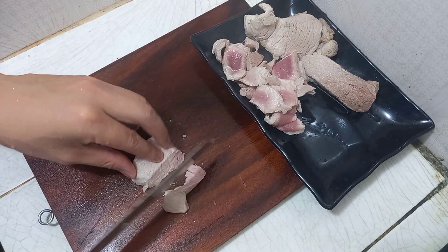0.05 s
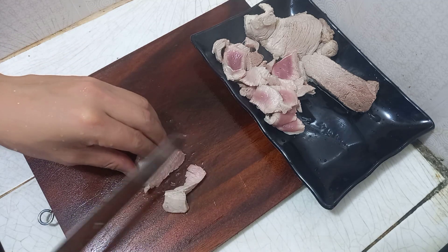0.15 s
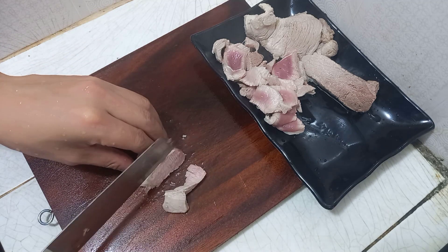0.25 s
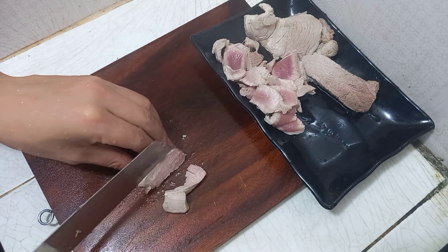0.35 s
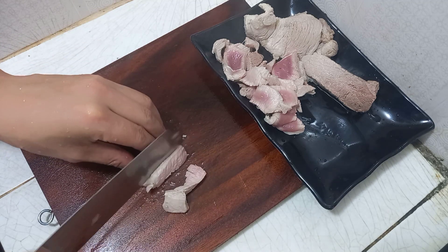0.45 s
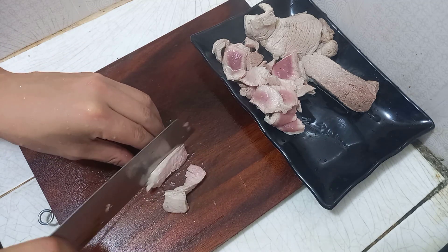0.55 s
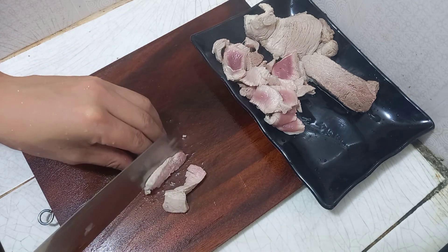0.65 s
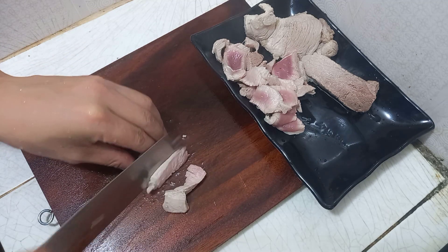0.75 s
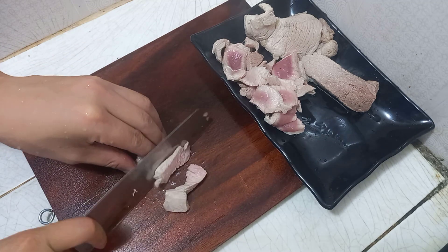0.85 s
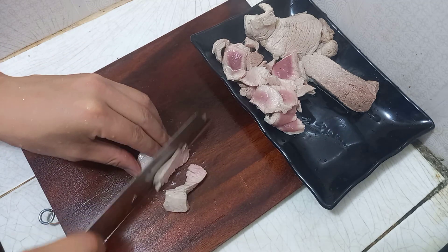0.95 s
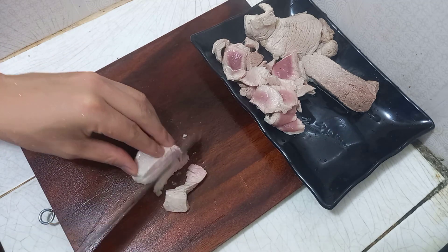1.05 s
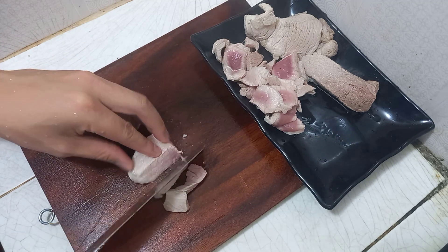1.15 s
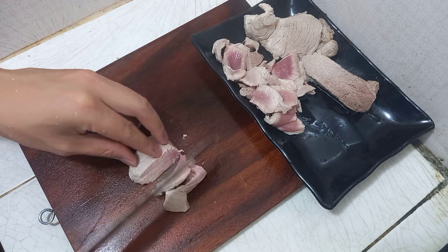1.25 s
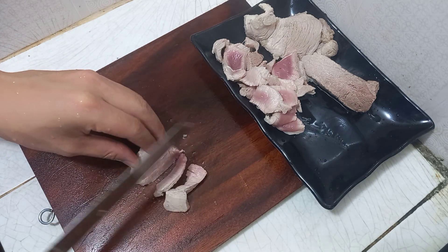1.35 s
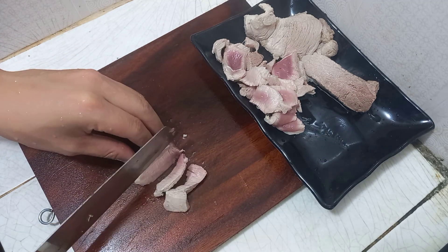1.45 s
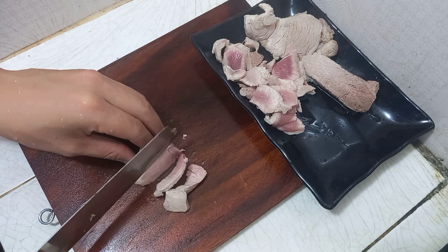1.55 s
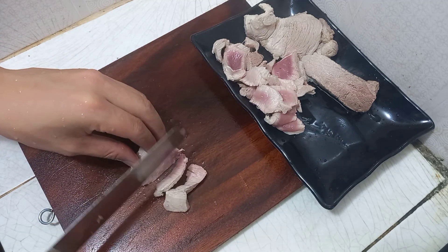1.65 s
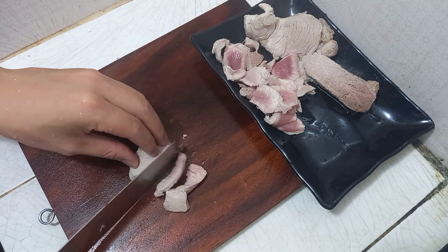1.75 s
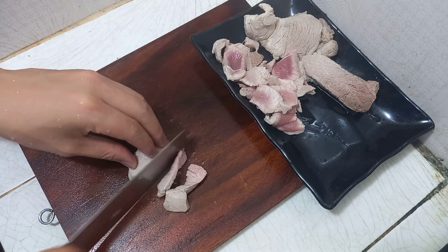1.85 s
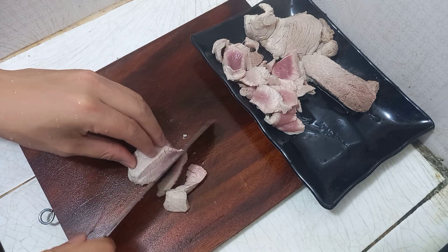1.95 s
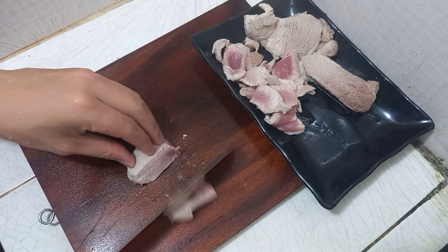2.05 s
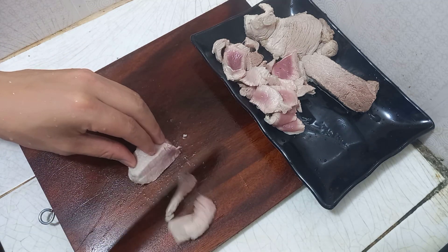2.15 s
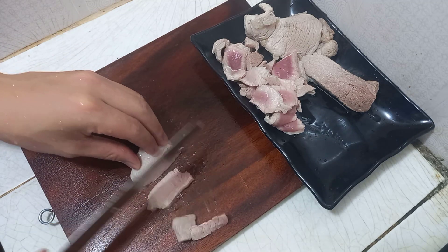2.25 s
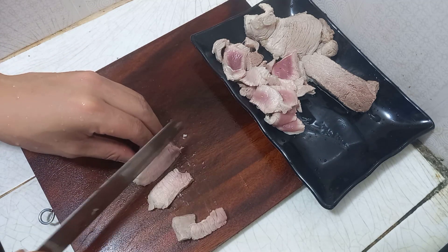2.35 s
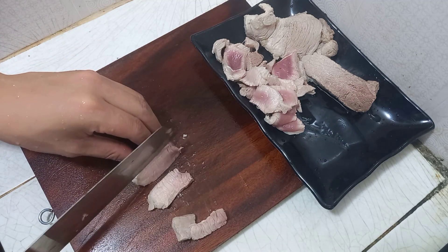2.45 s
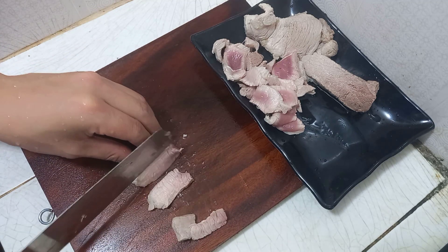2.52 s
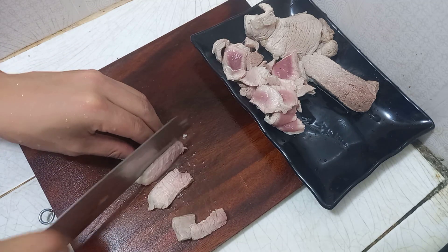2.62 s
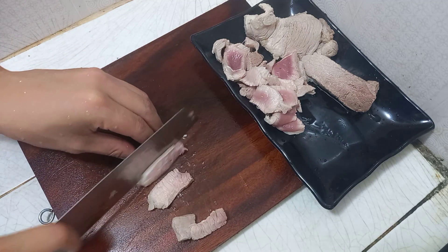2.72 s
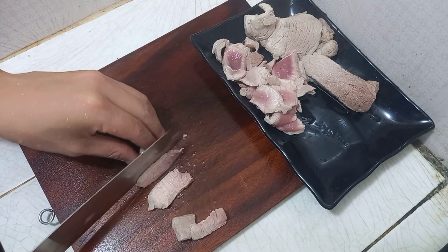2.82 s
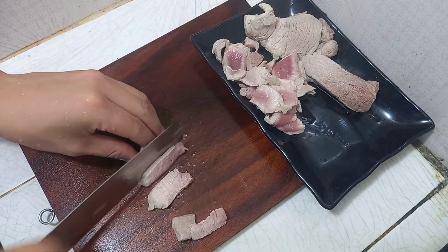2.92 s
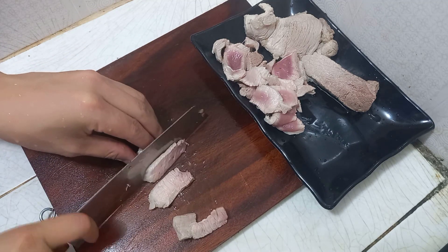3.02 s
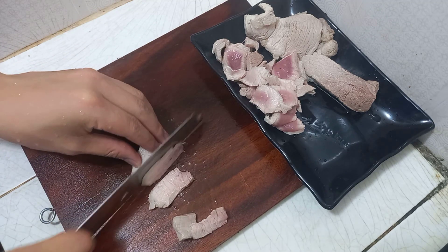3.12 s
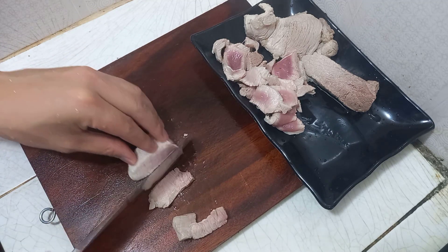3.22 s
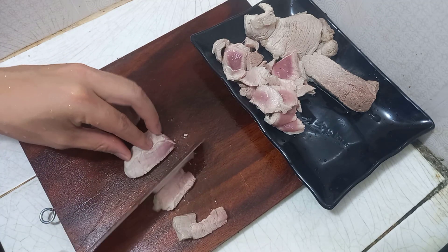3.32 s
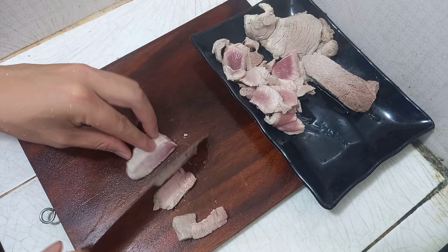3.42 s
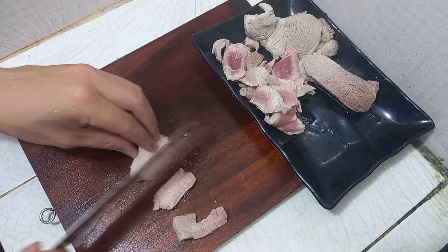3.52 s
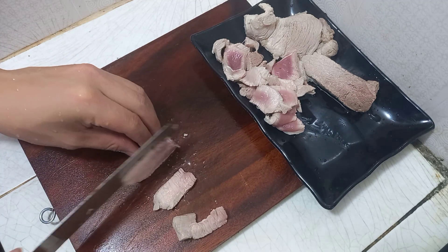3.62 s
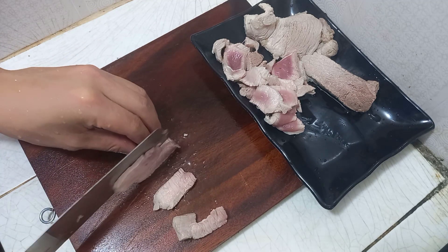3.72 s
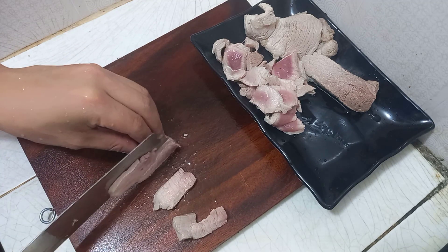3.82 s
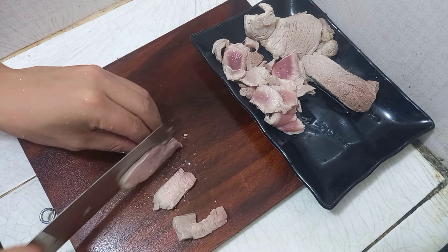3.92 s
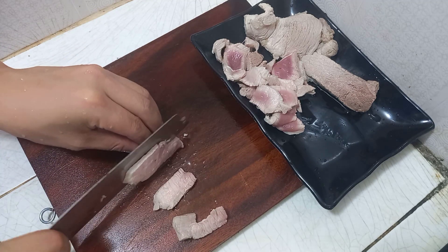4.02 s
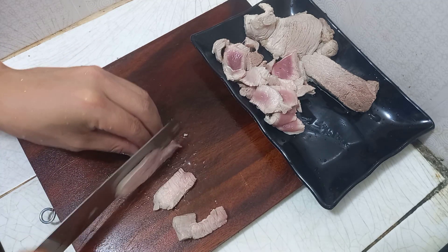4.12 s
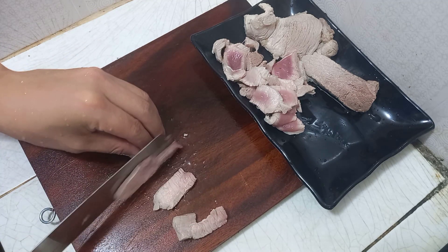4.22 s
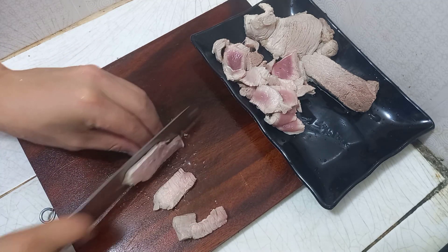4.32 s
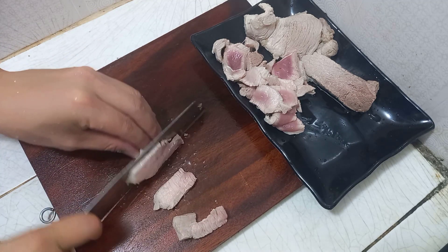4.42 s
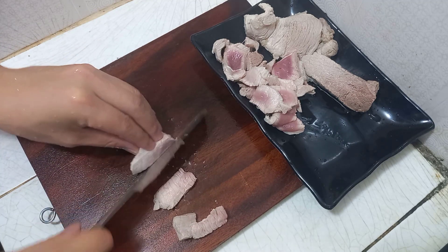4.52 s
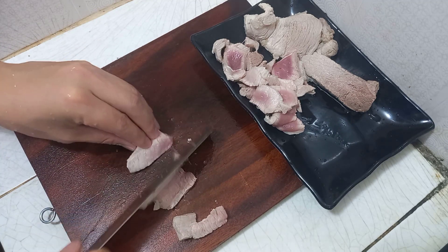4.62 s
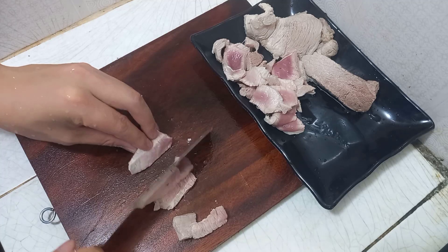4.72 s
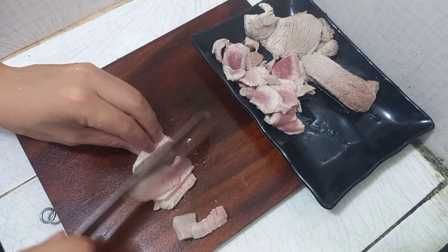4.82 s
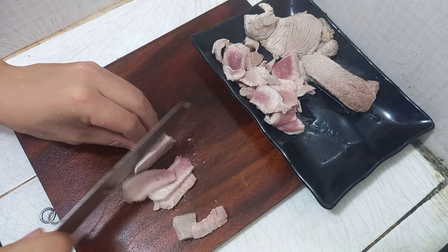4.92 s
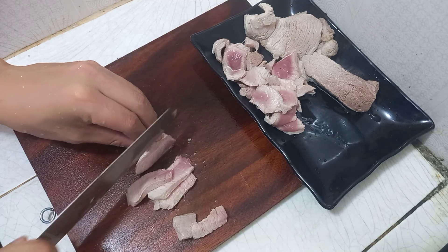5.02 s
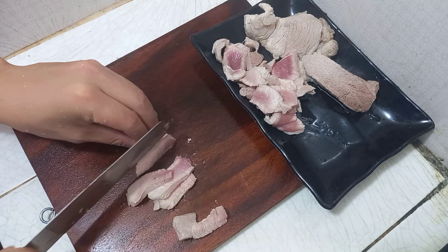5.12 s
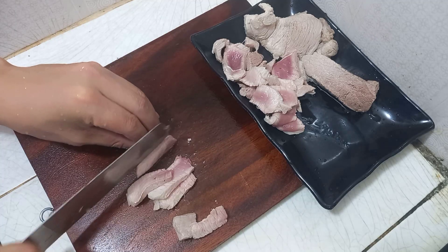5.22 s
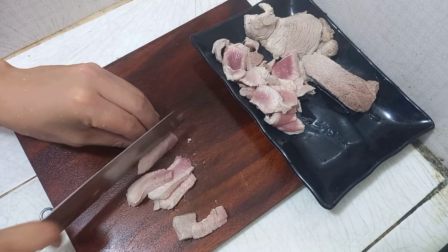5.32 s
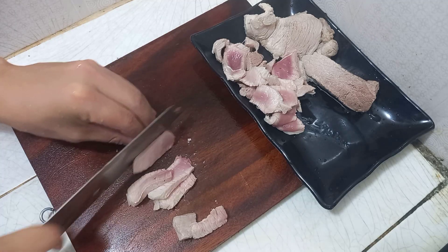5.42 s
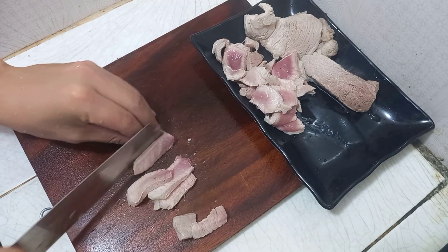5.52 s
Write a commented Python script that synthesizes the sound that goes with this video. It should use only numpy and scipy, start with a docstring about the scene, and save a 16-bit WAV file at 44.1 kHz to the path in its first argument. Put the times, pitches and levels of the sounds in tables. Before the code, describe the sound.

A low hum and soft air hiss run throughout in a small hard room. Close spaced stereo microphones catch a knife cutting cooked meat on a wooden board, its treble leaning left. After near quiet, gritty sawing strokes begin around 0.5 seconds and grow into a loud, hollow knock at 0.87, its low woody ring wavering briefly. A softer slice and a tiny tick follow at about 1.0; another knock, sharper and crisper, lands at 1.8. At 2.04 the blade is lightly tapped and rings, then drags sideways in a bright, singing scrape until about 2.15, with small ticks to 2.5. Slicing resumes at 2.65, swelling into the strongest knock at 3.03, then a quick, rough scrape at 3.3 and faint ticks. Strokes from 3.9 build to a last solid knock at 4.39, a short brush follows at 4.6, and lighter, faint sawing strokes close from 5.0 to 5.5.

```python
"""A low hum and a soft hiss of air fill a small hard room from start to end: patchy noise shaped by tone curves.
A kitchen knife saws through cooked meat: clumpy grains of noise swell with each stroke and shake the board.
From just under a second it knocks on the wooden board, whose modes ring over a beating pair in the counter.
Small ticks, short bursts of banded noise, follow from one second on. At two seconds the blade rings from a tap
and sings as it scrapes the slices aside; lighter strokes close. Two spaced microphones hear the knife from the left."""
import sys
import numpy as np
from scipy import signal
from scipy.fft import rfft, irfft, next_fast_len
from scipy.io import wavfile
from scipy.ndimage import uniform_filter1d

SR = 44100
rng = np.random.default_rng(int(sys.argv[2]) if len(sys.argv) > 2 else 0)


def wav_out(sig):
    """Save sig, one row per channel (or a flat mono array), as 16-bit PCM at SR to the path in sys.argv[1]."""
    wavfile.write(sys.argv[1], SR, np.round(np.clip(np.atleast_2d(sig).T, -1, 1) * 32767).astype(np.int16))


N = 245195


def amp(db):
    """Turns decibels into a gain."""
    return 10 ** (np.asarray(db) / 20)


def evened(x):
    """Scales a signal to an RMS of one."""
    return x / np.sqrt(np.mean(x ** 2) + 1e-20)


def read(points, hz):
    """Reads a curve of (frequency, value) points, interpolating along log frequency."""
    f, value = np.transpose(points)
    return np.interp(np.log(hz + 1), np.log(f + 1), value)


def add(mix, s, sound):
    """Mixes a sound into the track in place, s seconds in, cutting what runs past the end."""
    part = mix[..., round(s * SR):][..., :sound.shape[-1]]
    part += sound[..., :part.shape[-1]]


def colour(x, gain):
    """Filters by a gain given as a function of Hz."""
    size = next_fast_len(x.shape[-1])
    spectrum = rfft(x, size) * gain(np.fft.rfftfreq(size, 1 / SR))
    return irfft(spectrum, size)[..., :x.shape[-1]]


# hum tone curve: (frequency [Hz], relative level [dB])
HUM_TONE = [(20, -38), (33, -25), (48, -16), (65, -1.5), (78, -12), (98, 2), (120, -11.5), (145, -4),
            (165, -6.5), (195, -14.5), (225, -10), (280, -21), (400, -29.5), (650, -58)]
# room air and microphone hiss tone curve: (frequency [Hz], relative level [dB])
AIR_TONE = [(150, -65), (300, -4), (500, -7.5), (1000, -14), (2000, -20), (4000, -26.5), (7500, -33),
            (10500, -33), (13000, -22.5), (14500, -28.5), (15600, -29.5), (15900, -68)]
# background likeness of the two microphones: (frequency [Hz], left-right correlation [-1 to 1])
LIKENESS = [(60, 1), (180, 0.63), (550, 0.007), (1650, 0.021), (4970, 0.077), (15000, -0.086)]


def background(tone, db, patchy_db, size):
    """Steady noise from random short-time spectra, with random patches in level over time and frequency."""
    frames = 4 * N // size + 5
    hz = np.fft.rfftfreq(size, 1 / SR)
    a, b, c, d, patches = rng.standard_normal((frames, len(hz), 5)).T
    patches = evened(uniform_filter1d(uniform_filter1d(patches, 9, 0), 5, 1))
    same = np.clip(read(LIKENESS, hz), -1, 1)[:, None]
    left = a + 1j * b
    right = same * left + np.sqrt(1 - same ** 2) * (c + 1j * d)
    z = np.array([left, right]) * amp(read(tone, hz)[:, None] + patchy_db * patches)
    noise = signal.istft(z, nperseg=size, noverlap=3 * size // 4)[1][:, :N]
    return amp(db) * evened(noise) * amp([[.4], [-.4]])  # slightly louder on the left


# knife noise balance: (frequency [Hz], left minus right [dB])
KNIFE_LEAN = [(60, 2.0), (180, -40), (550, -9.5), (1650, 3.5), (4970, 0), (15000, 13)]
KNIFE_LAG_S = 0.000391  # the right microphone hears knife noise this much later
SHARED = 0.13  # least share of the knife noise that both microphones hear alike
ALIKE_HZ = 666  # well below this both microphones hear the knife noise alike


def pair(x):
    """Places knife noise on two microphones; in the treble the right one mostly hears nearby surfaces."""
    def share(hz):
        return np.clip(SHARED + (1 - SHARED) / (1 + (hz / ALIKE_HZ) ** 2), 0, 1)

    right = colour(x[0], share) + colour(x[1], lambda hz: np.sqrt(1 - share(hz) ** 2))
    ear = np.array([[0], [1]])  # left, right

    def place(hz):
        balance = amp(read(KNIFE_LEAN, hz) * (.5 - ear))
        return balance * np.exp(-2j * np.pi * hz * KNIFE_LAG_S * ear)

    return colour(np.array([x[0], right]), place)


def mode(hz, db, t60, lag=0.):
    """One dying sine, starting after lag seconds."""
    t = np.maximum(np.arange(SR) / SR - lag, 0)
    return amp(db - 60 * t / max(t60, .005)) * np.sin(2 * np.pi * hz * t)


# counter under the board, a close pair in opposite phase that beats:
# (frequency [Hz], relative level [dB], t60 [s])
COUNTER_MODES = [(158.2, 0, 0.74), (173.6, 1.5, 0.63)]
# board modes: (frequency [Hz], relative level [dB], t60 [s], left minus right [dB])
BOARD_MODES = [(229, -9.5, 0.36, 7), (260, 1, 0.042, .5), (325.7, -7.5, 0.33, -9), (382, -3, 0.24, -8),
               (429, 2, 0.097, 3.5), (463, -11, 0.49, -11), (484, 2.5, 0.094, 7.5), (557, -1, 0.067, -16.5),
               (598.8, -4, 0.26, 7), (614, 0, 0.16, -7), (672.6, -9.5, 0.19, -19.5),
               (726.4, -8.5, 0.16, 11), (795, -11, 0.049, -15), (836, -10, 0.21, -1), (923, -3.5, 0.15, 9),
               (975, -12, 0.15, 25.5), (1063, -24, 0.12, -19), (1150, -8.5, 0.032, 14.5),
               (1246, -11.5, 0.044, -7), (1450, -15, 0.049, 9), (1550, -1, 0.14, 4),
               (1668, -4.5, 0.063, 21), (1980, -13.5, 0.052, 32)]
WOOD_LAG_S = 0.0001  # the right microphone hears the wood this much later


def wood(thump_db, upper_db, place):
    """Impulse response of board and counter at both microphones; the place struck weights the board modes."""
    (low_hz, low_db, low_t60), (up_hz, up_db, up_t60) = COUNTER_MODES
    out = np.zeros((2, SR))
    for ear, lag in enumerate((0., WOOD_LAG_S)):
        lower = mode(low_hz, low_db, low_t60, lag)
        upper = mode(up_hz, up_db + upper_db, up_t60, lag)
        out[ear] = amp(thump_db) * (lower - upper)
        for k, (hz, db, t60, lean_db) in enumerate(BOARD_MODES):
            weight = 1 + .5 * np.cos(np.pi * (k + 1) * place)
            sign = (-1) ** (k // 2)
            out[ear] += sign * weight * mode(hz, db + lean_db * (.5 - ear), t60, lag)
    # a small board radiates no deep bass
    return signal.sosfilt(signal.butter(2, 110, "high", fs=SR, output="sos"), out)


def grit():
    """Dense uneven grains that come in clumps."""
    clumps = evened(uniform_filter1d(rng.standard_normal(N), 90))
    grain_db = 1.1 * clumps + 1.35 * rng.exponential(1, N)
    return evened(rng.standard_normal((2, N)) * amp(grain_db))


REST_DB = -30  # level at the start of a run-up and the end of a run-out, re the hold


def sweep(s, up, hold, out, db, swell_db):
    """One movement: gain, dB relative to the hold and seconds spent in the hold, over time."""
    t = np.arange(N) / SR - s
    held = np.clip(t, 0, hold)
    before = np.maximum(-t, 0) / max(up, .002)
    after = np.maximum(t - hold, 0) / max(out, .002)
    under_db = REST_DB * (before + after)
    return amp(db + swell_db * held / max(hold, .001) + under_db), under_db, held


# knife strokes: (full speed reached [s], run-up [s], hold [s], run-out [s], edge hiss [dB],
# swell over the hold [dB], push into the board [dB re hiss], weight on the counter [dB re hiss],
# rasp near 2.8 kHz [dB], treble tilt [dB per octave])
KNIFE_STROKES = [ (0.0, .01, .01, 0.11, -54.5, -1, -4, -8, 0, -3),
                 (.492, 0.051, 0.058, 0.12, -40, 1, -6.5, 4, 3.5, 1.5),
                 (0.677, 0.11, 0.055, 0.064, -45.5, 0.5, -1, 6, 2, 1.5),
                 (0.823, 0.077, 0.048, 0.082, -36, 5, 1.5, 4, 4, 1.5),
                 (1.028, 0.13, 0.098, 0.083, -44, -4.5, 0.5, 1, 0, -0.5),
                 (1.903, 0.11, 0.072, 0.1, -41.5, 0, 6.5, -4, -7, -2),
                 (2.04, 0.0086, .004, 0.045, -27.5, -1, -2, -21, 2.5, 0),
                 (2.096, 0.042, 0.028, 0.034, -24.5, -2, 0.5, -9.5, 5.5, 0),
                 (2.143, .02, 0.017, 0.17, -40, -3, -10, -13, 4, -1),
                 (2.304, .006, .008, 0.061, -44.5, -0.5, -16, -16, 12, 3),
                 (2.656, 0.036, 0.05, 0.092, -42, -1, -9, 6, 1, 2),
                 (2.874, 0.15, .02, .055, -48.5, -1.5, -22, -10, 4, 0.5),
                 (2.974, 0.045, 0.066, 0.047, -43, 13.5, 1.5, 4, 5, 2),
                 (3.175, 0.23, 0.11, .03, -45.5, -5, 4.5, 1, 1.5, -1),
                 (3.299, 0.04, 0.015, 0.037, -30, 3.5, 1.5, -12, 7.5, -1),
                 (3.332, .02, 0.017, 0.15, -37.5, -2.5, -2.5, -11, -3, -2.5),
                 (3.947, .05, 0.095, 0.12, -48.5, 4.5, -6, 0.5, 3.5, 3),
                 (4.195, .2, .015, .11, -50, 1.5, -2.5, 6, 0, 0.5),
                 (4.308, 0.047, 0.074, 0.062, -42.5, 13, 4, 5, 5, 2),
                 (4.456, .05, 0.037, .05, -52, 3.5, -3, -5, -1, 2.5),
                 (4.55, 0.13, .015, 0.044, -53, 1, -6, -8, -4, -2),
                 (4.601, 0.024, 0.0066, 0.048, -37, 0, 2, -4, -1.5, -1),
                 (4.638, .02, 0.033, 0.13, -49, -1.5, -1, -7, 1, -0.5),
                 (5.02, 0.036, .005, 0.047, -58, 4, 11, 3, 14.5, 0.5),
                 (5.347, 0.079, 0.051, .07, -46, 2, -4.5, -3, 12.5, 2),
                 (5.55, 0.2, 0.018, .05, -48, 3, -2.5, 4, 2, 1), ]
DULLING = .06  # treble tilt lost, dB per octave, for each dB under the hold
DARKENING = 9.3  # treble tilt lost, dB per octave, for each second of hold as the edge sinks in


def motion():
    """Strokes add in power; where they overlap, push, weight, rasp and tilt lean to the louder one."""
    power, controls = 1e-14, 0
    for *shape, push_db, weight_db, rasp_db, tilt in KNIFE_STROKES:
        gain, under_db, held = sweep(*shape)
        steady = np.outer([push_db, weight_db, rasp_db], np.ones(N))
        tilt_now = tilt + DULLING * under_db - DARKENING * held
        controls = controls + gain ** 2 * np.vstack([steady, tilt_now])
        power = power + gain ** 2
    return uniform_filter1d(np.sqrt(power), 100), *controls / power


# edge in meat and on wood, tone curve: (frequency [Hz], relative level [dB])
EDGE_TONE = [(600, -8), (1200, 2), (1700, -0.5), (2800, -4.5), (3500, -0.5), (6600, -1), (7600, -9.5),
             (9240, -2), (11000, -6.5), (14600, -4.5), (15550, -6.5), (15850, -50)]


def strokes():
    """Tearing fibres and a dragging edge hiss in shifting patches of colour and shake the board."""
    level, push_db, weight_db, rasp_db, tilt = motion()
    grains = grit()
    edge = evened(colour(grains, lambda f: amp(read(EDGE_TONE, f))))
    hz, at, z = signal.stft(edge, SR, nperseg=256)
    t = np.arange(N) / SR
    octaves = np.log2(np.maximum(hz, 900) / 7000)[:, None]  # the tilt pivots at 7 kHz
    tilt_db = octaves * np.interp(at, t, tilt)
    rasp = np.exp(-((hz[:, None] - 2800) / 380) ** 2) * np.interp(at, t, rasp_db)
    patches = evened(uniform_filter1d(uniform_filter1d(rng.standard_normal(z.shape[1:]), 4, 0), 9, 1))
    hiss = signal.istft(z * amp(tilt_db + rasp + 3.0 * patches), SR, nperseg=256)[1][:, :N]
    board = wood(-np.inf, 0, 0.352)  # no counter in it
    counter = wood(0, -0.88, 0.353) - board
    shake = 0
    for db, part in ((push_db, board), (weight_db, counter)):
        body = colour(part, lambda f: 1 / (1 + (f / 480) ** 2))  # the meat softens the push
        push = grains[:1] * level * amp(db)
        shake = shake + signal.fftconvolve(push, body / np.linalg.norm(body[0]), axes=1)[:, :N]
    return pair(hiss * level) + shake


# room decay: (frequency [Hz], t60 [s])
ROOM_DECAY = [(200, 0.7), (700, 0.41), (2000, 0.31), (6000, 0.17), (14000, 0.14)]


def room(x):
    """Sparse echo taps of random sign, each band dying at its own speed."""
    taps = np.zeros((2, SR))
    at = np.arange(100, SR - 20, 20) + rng.integers(0, 20, (2, (SR - 101) // 20))
    np.put_along_axis(taps, at, rng.choice([-1., 1.], at.shape), 1)
    hz, t, z = signal.stft(taps, SR, nperseg=256)
    t60 = np.maximum(read(ROOM_DECAY, hz), .02)[:, None]
    tail = signal.istft(z * amp(-60 * t / t60), SR, nperseg=256)[1]
    return signal.fftconvolve(x.mean(0)[None], tail / np.linalg.norm(tail[0]), axes=1)[:, :N]


CRACK_HZ = 4270  # top of the edge's crack


def knock(contact_ms, thump_db, upper_db, place, rebound_ms, rebound_db, thud_db, thud_hz, crack_db):
    """A short smooth blow and its rebound ring the wood; countless small modes thud, the steel edge cracks."""
    t = np.arange(SR) / SR
    force = 0
    for start_ms, db in ((0, 0), (rebound_ms, rebound_db)):
        progress = np.clip((t[:800] * 1000 - start_ms) / max(contact_ms, .05), 0, 1)
        force = force + amp(db) * np.sin(np.pi * progress) ** 2
    ring = signal.fftconvolve(wood(thump_db, upper_db, place), force[None], axes=1)[:, :SR]
    noise = rng.standard_normal((2, 2, SR))

    def thud_tone(hz):
        hump = amp(-7 * np.log2((hz + 1) / thud_hz) ** 2)
        return hump / (1 + (hz / (2.0 * thud_hz)) ** 6) * hz ** 4 / (hz ** 4 + 380 ** 4)

    thud = evened(colour(noise[0], thud_tone))
    crack = evened(colour(noise[1], lambda hz: 1 / (1 + (hz / CRACK_HZ) ** 4) * (hz > 1200)))
    # each dies fast at first, then slowly
    thud_fade = amp(3 - 60 * t / 0.084) + amp(-4.5 - 60 * t / 0.41)
    thud = amp(thud_db) * thud_fade * np.minimum(t / 0.0034, 1) * thud
    crack_fade = amp(-60 * t / 0.013) + amp(-8.0 - 60 * t / 0.22)
    crack = amp(crack_db) * crack_fade * crack
    return ring / abs(ring.mean(0)).max() + pair(thud + crack)


# edge landing on the wood: (time [s], peak of the wood's ring [dB], contact [ms], counter thump [dB],
# trim of the upper counter mode [dB], place along the board [0-1], rebound after [ms], rebound [dB],
# dense thud trim [dB re ring peak], thud centre before bass cut [Hz], crack trim [dB re ring peak])
EDGE_KNOCKS = [(.874, -4, 0.89, -5.5, -3, 0.28, 7.3, -10.5, -11.5, 634, -18),
               (1.794, -5, 0.31, -4, 1, 0.35, 5.7, -16, -7, 907, -16),
               (2.037, -18.5, 1, -10, 11.5, .31, 3.9, -7, -18, 596, -35),
               (3.03, -2, 0.92, -2.5, -5.5, .32, 5.42, -14, -17.5, 556, -20.5),
               (4.388, -3.5, 0.87, -5.5, -1, 0.34, 6.5, -20, -14.5, 544, -21)]


def knocks():
    """The edge lands on the board, each blow with its own force, place and rebound."""
    out = np.zeros((2, N))
    for s, db, *blow in EDGE_KNOCKS:
        add(out, s, amp(db) * knock(*blow))
    return out


def tick(hz, t60, width):
    """A short burst of noise in a band."""
    t = np.arange(SR // 10) / SR
    noise = rng.standard_normal((2, len(t)))
    burst = colour(noise, lambda f: 1 / (1 + ((f - hz) / (width * hz)) ** 2) * (f > 1500))
    burst = burst * amp(-60 * t / max(t60, .002))
    return pair(burst / abs(burst).max())


# small wet or steel ticks: (time [s], peak before placing on the microphones [dB], centre [Hz], t60 [s],
# half-width as a share of the centre)
SMALL_TICKS = [(1.051, -24, 9230, 0.012, 0.23), (2.3051, -19, 5150, 0.0085, 0.5),
               (2.4, -31, 8000, .025, 0.97), (2.4587, -33.5, 13600, 0.011, .24),
               (3.2057, -25.5, 14630, .012, .4), (3.24, -27, 13100, 0.011, 0.32),
               (3.283, -29, 3050, .011, .6), (3.4506, -42, 13900, .009, .35), (3.682, -41, 5000, .013, .6),
               (4.4617, -30, 11700, .012, .3), (4.4857, -45, 4850, .01, .4),
               (4.5536, -41, 9300, 0.014, 0.34), (4.686, -33.5, 13000, .012, .4),
               (4.998, -44, 14200, .012, 0.37), (5.0215, -45, 5770, .011, .4),
               (5.0994, -48.5, 13800, .012, .4)]


def ticks():
    """Small wet or steel ticks, each a dying burst in its own band."""
    out = np.zeros((2, N))
    for s, db, *shape in SMALL_TICKS:
        add(out, s, amp(db) * tick(*shape))
    return out


# blade modes: (frequency [Hz], t60 [s], tapped flat [dB], dragged sideways [dB]), levels relative
BLADE_MODES = [(2800, .12, -14, -4), (3200, .05, -7, -12), (4587, .1, -1, -9), (4974, .12, -20, -7),
               (5300, .05, -20, -5), (6140, .1, -18, -9), (6604, .27, -26, 1), (6621, .25, -26, -3),
               (6810, .1, -22, -3), (8570, .12, -20, -11), (9740, .14, -5, -11), (10770, .14, -20, -5),
               (13000, .08, -16, -9), (14200, .1, -18, -8)]
# tap on the blade: (time [s], peak before left-right balance [dB])
TAP = (2.039, -20)
# blade dragged sideways: (full speed reached [s], run-up [s], hold [s], run-out [s])
DRAG = (2.091, .04, .028, .022)
DRAG_DB, DRAG_SWELL_DB = -28.5, -1  # drive at the start of the hold, change over the hold


def blade():
    """The free steel rings once when tapped and sings while it is dragged sideways over the board."""
    tapped = sum(mode(hz, db, t60) for hz, t60, db, _ in BLADE_MODES)
    dragged = sum(mode(hz, db, t60) for hz, t60, _, db in BLADE_MODES)
    scrape = grit()[0] * sweep(*DRAG, DRAG_DB, DRAG_SWELL_DB)[0]
    ring = signal.fftconvolve(scrape, dragged / np.linalg.norm(dragged))[:N]
    tap_s, tap_db = TAP
    add(ring, tap_s, amp(tap_db) * tapped / abs(tapped).max())
    return ring * amp([[1.8], [-1.8]])  # louder on the left


def scene():
    """The knife and its room reflections over the hum and the air."""
    hum = background(HUM_TONE, -39, patchy_db=0.67, size=8192)
    air = background(AIR_TONE, -50.5, patchy_db=0.97, size=1024)
    knife = strokes() + knocks() + ticks() + blade()
    walls = colour(room(knife), lambda hz: hz ** 2 / (hz ** 2 + 480 ** 2))  # the small room returns little bass
    return knife + amp(-6.5) * walls + hum + air


CEILING = .93  # level the rounded peaks approach, full scale = 1
TOP_HZ = 16350  # band limit


def record(dry):
    """The input stage rounds off mainly the tallest peaks; then a steep filter limits the band."""
    rounded = dry / (1 + (abs(dry) / CEILING) ** 4) ** .25
    lowpass = signal.firwin(1023, TOP_HZ, window=("kaiser", 9), fs=SR)
    return signal.oaconvolve(rounded, lowpass[None], "same")


dry = scene()
out = record(dry)
wav_out(out)
```